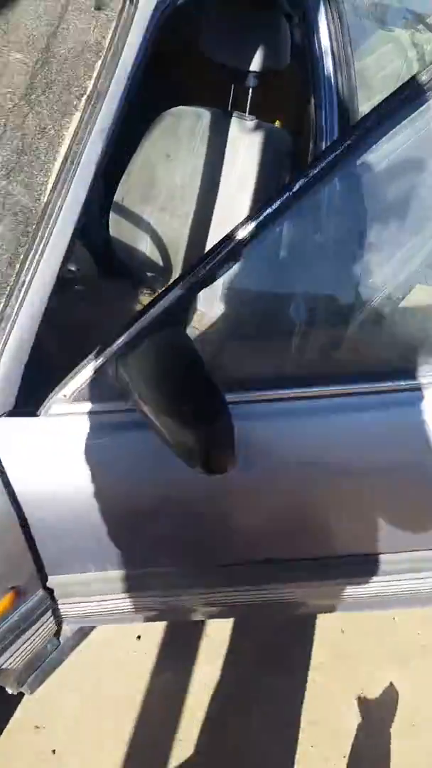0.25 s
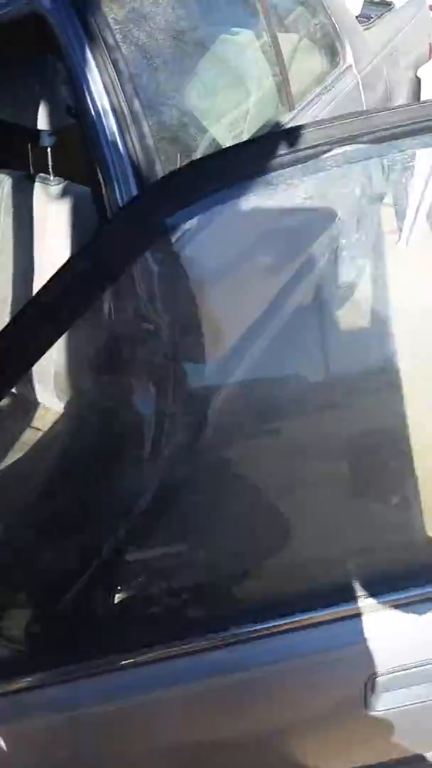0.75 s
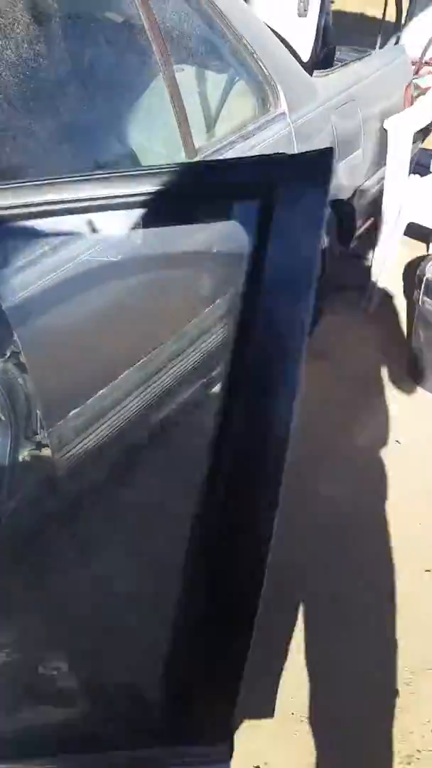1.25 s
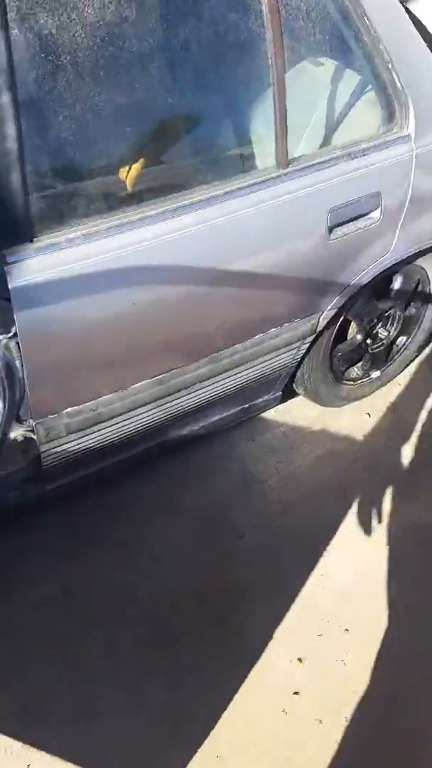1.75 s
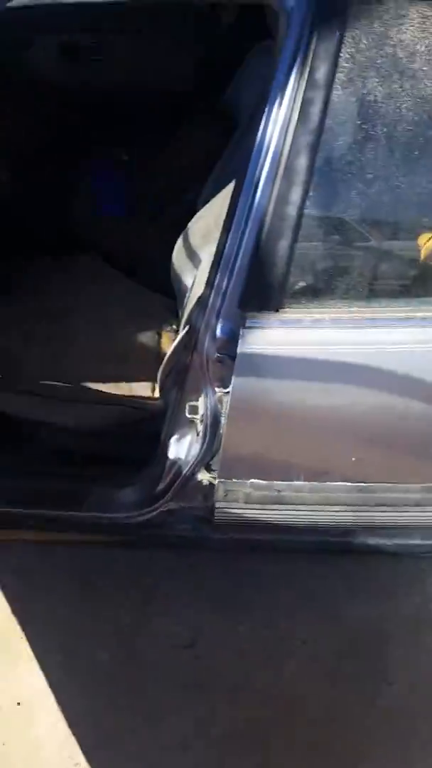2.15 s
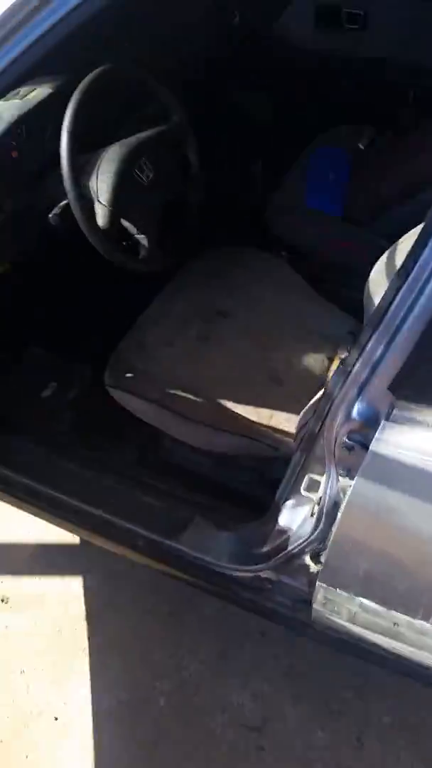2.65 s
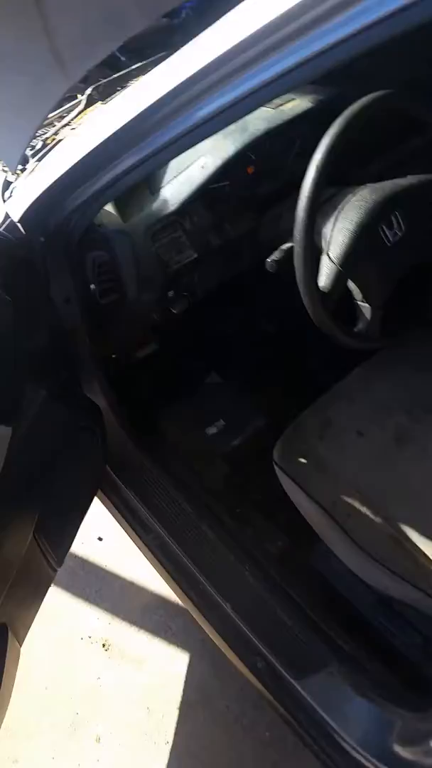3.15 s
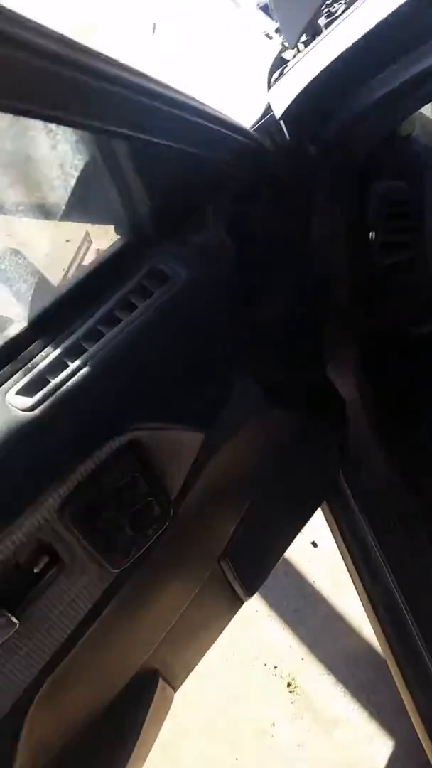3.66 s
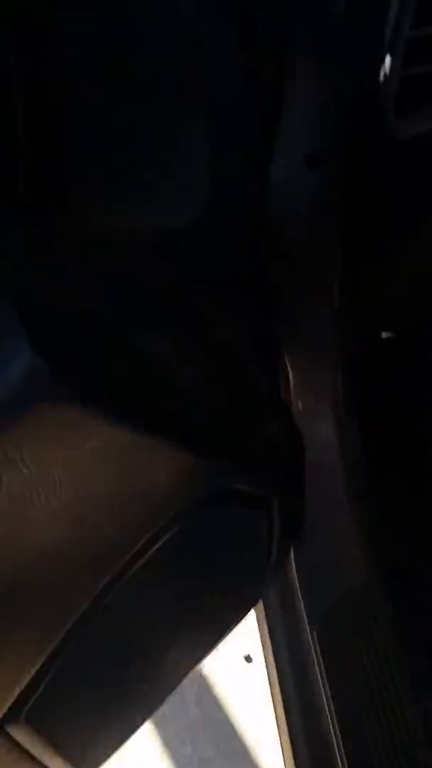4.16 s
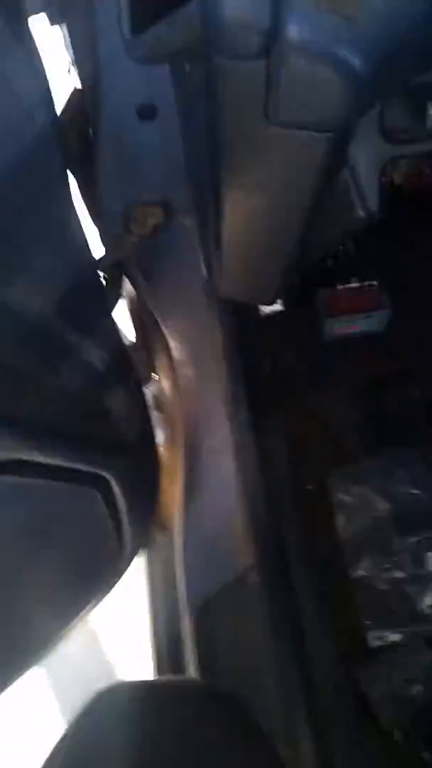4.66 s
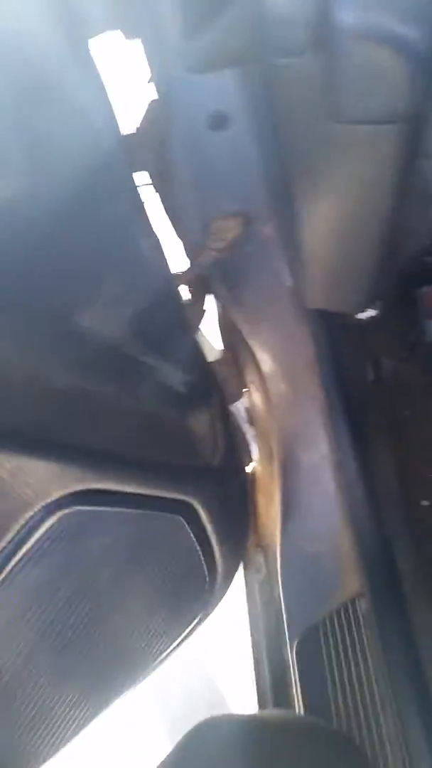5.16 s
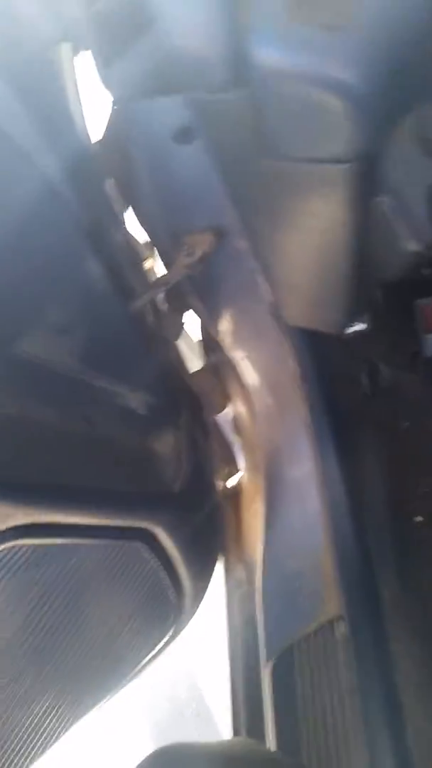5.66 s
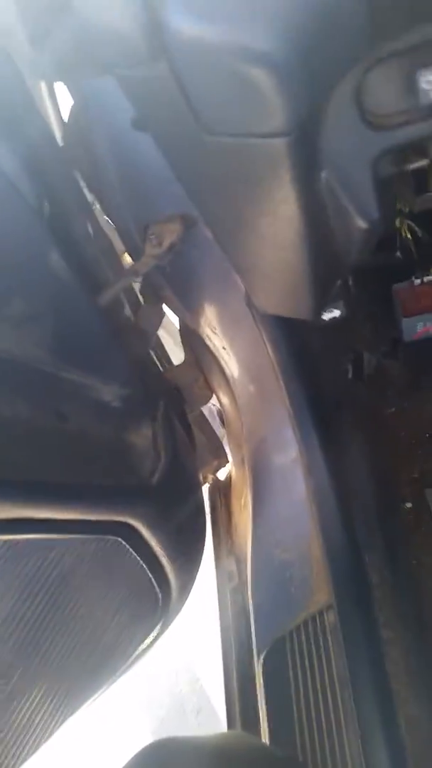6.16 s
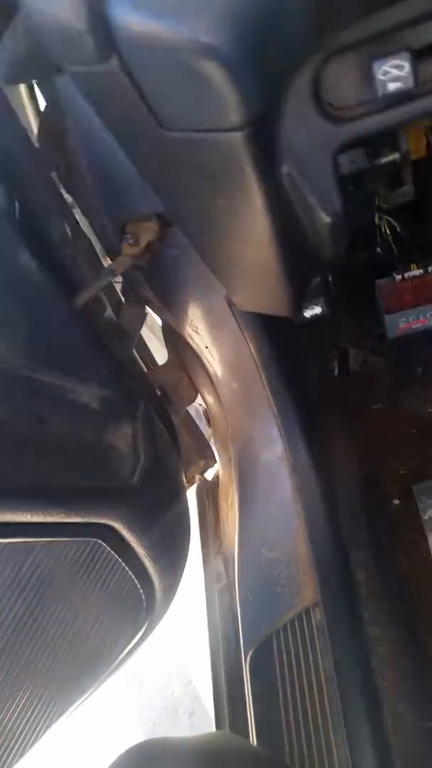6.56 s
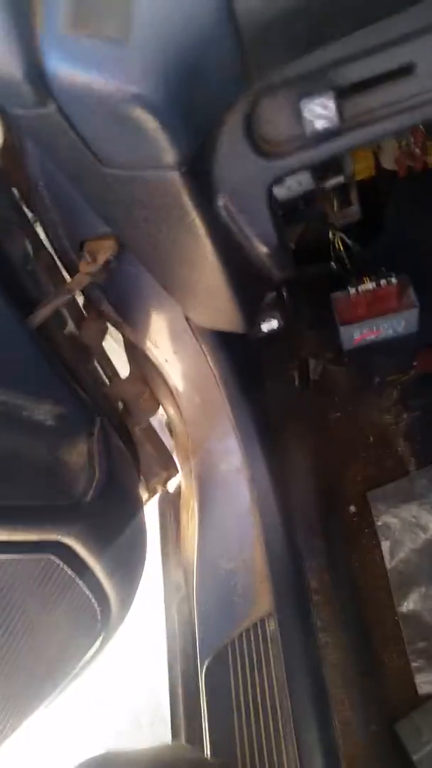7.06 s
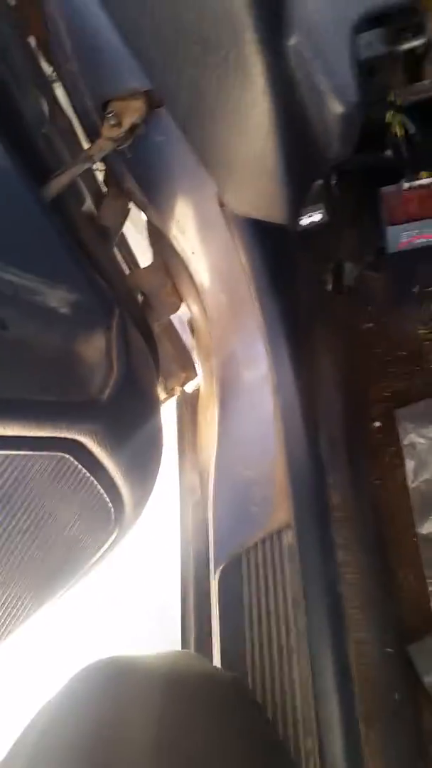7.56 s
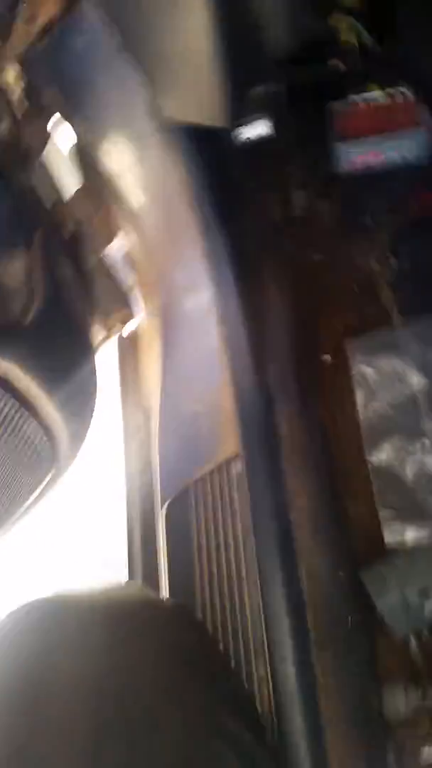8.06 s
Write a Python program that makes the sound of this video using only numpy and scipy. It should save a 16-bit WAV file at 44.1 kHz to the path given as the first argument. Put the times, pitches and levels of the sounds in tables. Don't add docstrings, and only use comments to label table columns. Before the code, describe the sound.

Close, moving phone pickup of a car idling lumpily: low exhaust throb, ringing body metal, airy hiss and quick valve ticks. It starts bright and full beside the engine, thins behind the door, then grows boomy inside the footwell. Near the end ignition stops; the beat breaks into slowing, irregular soft low notes and muffled rumbles, with a sharp plastic and metal click and short cloth rustles over the dying air.

```python
import sys
import numpy as np
from scipy import signal
from scipy.fft import rfft, irfft
from scipy.io import wavfile
from scipy.ndimage import uniform_filter1d

SR = 44100
rng = np.random.default_rng(int(sys.argv[2]) if len(sys.argv) > 2 else 0)


def magnitude_from_level(level_db):
    exponent = np.asarray(level_db, float) / 20
    return 10 ** exponent


def dump_mix(stems):
    frames = np.atleast_2d(stems).T
    limited = np.clip(frames, -1, 1)
    pcm = np.round(limited * 32767).astype(np.int16)
    wavfile.write(sys.argv[1], SR, pcm)


N = 366030
T = np.arange(N) / SR
CUT_S = 6.74
HEAVE_S = 0.053

# [time_s, engine_cycles_per_s]
IDLE = [(0.0, 11.263), (0.667, 10.754), (1.294, 11.33), (1.695, 11.221), (2.407, 10.574), (3.222, 10.975),
        (3.807, 10.962), (4.388, 10.651), (5.0, 10.844), (5.345, 10.985), (5.923, 10.545), (6.6, 10.95),
        (6.74, 10.465)]
# [time_s, stop]
WALK = [(0, 0), (.3, .5), (.6, 1), (.95, 1.32), (1.35, 2), (1.8, 2), (2.3, 3), (2.7, 3), (3.2, 4),
        (3.75, 4.5), (4.2, 5.5), (4.6, 5), (5.1, 5.5), (5.75, 5.5), (6.6, 5.5)]
# [time_s, level_db]
HEAVES = [(6.83, 3), (6.95, 5), (7.269, 3), (7.438, -2.5), (7.6, 3), (7.92, 8.5), (8.05, 6), (8.2, 0)]
STOP = np.interp(T, *np.transpose(WALK))


def evened(x):
    return x / np.sqrt(np.mean(x ** 2) + 1e-20)


def along(rows):
    s, *columns = np.transpose(rows)
    return [np.interp(T, s, column) for column in columns]


def at_stops(values):
    return np.interp(STOP, np.arange(len(values)), values)


def read(points, hz):
    f, value = np.transpose(points)
    return np.interp(np.log(hz + 1), np.log(f + 1), value)


def bump(s, half_s):
    return np.exp(-.5 * ((T - s) / half_s) ** 2)


def later(x, s):
    n, cycle = int(s * SR), int(SR / IDLE[0][1])
    return np.concatenate([x[cycle - n:cycle], x[:N - n]])


def band_filter(x, order, hz, kind):
    return signal.sosfiltfilt(signal.butter(order, hz, kind, fs=SR, output="sos"), x)


def ring(x, hz, width):
    r = np.exp(-np.pi * width / SR)
    angle = 2 * np.pi * hz / SR
    return signal.lfilter([(1 - r) * np.sin(angle)], [1, -2 * r * np.cos(angle), r * r], x)


def ports(pair, colour):
    # [pitch_hz, left_over_right_db]
    left_over_right = [(60, -11), (200, -5), (380, 1), (700, 4), (1290, 0.5), (2380, 3), (4400, 10),
                       (6000, -5), (8100, 35), (9500, 55), (11500, 13), (15000, 12)]
    # [pitch_hz, likeness]
    likeness = [(60, 1), (180, 0.26), (550, 0.12), (1650, 0.0085), (4970, -0.25), (15000, 0.0067)]
    hz = np.fft.rfftfreq(pair.shape[1], 1 / SR)
    a, b = rfft(pair)
    same = np.clip(read(likeness, hz), 0, 1)
    over = magnitude_from_level(read(left_over_right, hz))
    z = np.array([a * over, same * a + np.sqrt(1 - same ** 2) * b])
    z /= np.sqrt(1 + over ** 2 + 2 * same * over)
    out = irfft(z * magnitude_from_level(read(colour, hz)), pair.shape[1])
    return out / np.sqrt(np.mean(out.mean(0) ** 2))


def crank():
    drag_per_s, coast_s = 11.52, 2.924
    coast = (IDLE[-1][1] + drag_per_s) * np.exp(-(T - CUT_S) / coast_s) - drag_per_s
    rate = np.where(T < CUT_S, along(IDLE)[0], coast)
    return rate, np.cumsum(rate) / SR


def coasting(late_s=0):
    lost = 1 - np.exp(-np.maximum(T - CUT_S - late_s, 0) / 0.056)
    return lost, (T > CUT_S) * np.log2(IDLE[-1][1] / crank()[0])


def shake():
    shudder_db = [-40, -43, -50, -54, -46, -42, -26]
    shake_hz = 27.8
    low = ring(ring(rng.standard_normal(N), shake_hz, width=21), shake_hz, width=21)
    return evened(low) * magnitude_from_level(at_stops(shudder_db) - 3.4 * coasting()[1])


def rustle():
    # [pitch_hz, level_db_per_hz]
    cloth_colour = [(400, 4.5), (620, -4), (900, 4), (1300, 1.5), (2000, -11), (3200, -14), (5000, -36),
                    (6500, -56), (8800, -11), (10500, -24), (12500, -43)]
    # [time_s, level_db, half_length_s, fizz_db, body_db]
    rub_events = [(7.567, -48.5, .03, 9, -1), (7.61, -48, .015, -2, 5), (7.687, -45.5, 0.029, 3, 5),
                  (7.758, -50, 0.022, 10.5, -1), (7.832, -46, 0.026, 4.5, 2), (7.875, -55, .016, 12, -4),
                  (7.926, -49, 0.025, -2, 4.5), (8.036, -43, .035, -7, -13), (8.13, -50, .025, -17.5, -16),
                  (8.197, -50.5, 0.038, -17, -16)]
    clumps_db = 2.5 * evened(uniform_filter1d(rng.standard_normal(N), 500))
    rub = ports(rng.standard_normal((2, N)), cloth_colour) * magnitude_from_level(clumps_db)
    fizz = band_filter(rub, 4, 6000, "high")
    body = band_filter(rub, 4, 1200, "low")
    s, db, half, fizz_db, body_db = np.transpose(rub_events)
    swells = magnitude_from_level(db)[:, None] * np.array([bump(*b) for b in zip(s, half)])
    sound = swells.sum(0) * rub
    sound += (magnitude_from_level(fizz_db) - 1) @ swells * fizz
    return sound + (magnitude_from_level(body_db) - 1) @ swells * body


def clicks():
    # [time_s, peak_db, rise_s, fade_60db_s, brightness_db_per_octave]
    creak_events = [(3.298, -33, .002, .035, -14), (4.4405, -23.5, .003, .038, -4.5)]
    # [time_s, peak_db, rise_s, fade_60db_s, brightness_db_per_octave]
    latch_events = [(7.4672, -33, 0.001, 0.055, 1), (7.4737, -15, 0.0028, 0.057, 1),
                    (7.481, -24, 0.0023, 0.045, -3), (7.491, -34.5, .0004, 0.11, -2.5),
                    (7.677, -40, 0.0035, 0.082, -21), (7.965, -40, 0.0079, .1, -14),
                    (7.993, -48, 0.00049, 0.031, 0)]
    # [pitch_hz, level_db_per_hz]
    trim_colour = [(500, -25), (1100, -2), (2000, 0), (3200, -5), (4400, -1), (6000, -22), (9000, -10),
                   (15000, -22)]
    # [pitch_hz, level_db_per_hz]
    latch_colour = [(240, -41), (400, -14), (560, -4), (680, -14), (790, -5), (1030, -21), (1400, -5),
                    (1830, -3), (2200, -14), (2800, -10), (4510, -8), (6740, -27), (8630, -2), (14800, -18),
                    (16000, -25)]
    # [pitch_hz, level_db, fade_60db_s]
    spring_modes = [(4600, -52, .16), (2510, -55, .15), (810, -42, .15), (577, -31, 0.11), (487, -49, .12)]
    out, t = np.zeros((2, N)), np.arange(4096) / SR
    for s, db, rise, t60, tilt_db in creak_events + latch_events:
        points = latch_colour if s > CUT_S else trim_colour
        colour = [(hz, v + tilt_db * np.log2(hz / 4000)) for hz, v in points]
        shape = np.clip(t / rise, 0, 1) ** 2 * magnitude_from_level(db - 60 * t / t60)
        at = round(s * SR)
        out[:, at:at + len(t)] += ports(rng.standard_normal((2, len(t))), colour) * shape
    at, t = round(latch_events[1][0] * SR), np.arange(8192) / SR
    spring = sum(magnitude_from_level(db - 60 * t / t60) * np.sin(2 * np.pi * hz * t) for hz, db, t60 in spring_modes)
    out[:, at:at + len(t)] += spring * np.clip(t / 0.0038, 0, 1)
    return out


def thuds():
    thud_hz = 209
    lost, halvings = coasting()
    lumps_db = 2.4 * evened(uniform_filter1d(rng.standard_normal(N), 900))
    lumps_db += 0.7 * sum(db * bump(s, HEAVE_S) for s, db in HEAVES)
    gas = ring(ring(rng.standard_normal(N), thud_hz, width=240), thud_hz, width=240)
    level_db = -30.5 - 6.5 * halvings + lumps_db
    return evened(gas) * lost * magnitude_from_level(level_db) * magnitude_from_level([[-1.2], [1.2]])


def gulps():
    # [time_s, peak_db, pitch_hz, half_length_s]
    gulp_events = [(6.799, -11.5, 87, 0.03), (6.843, -15, 91, 0.011), (6.888, -12.5, 84, 0.015),
                   (6.949, -15, 90, 0.019), (7.04, -23, 80, 0.022), (7.126, -20, 101, 0.028),
                   (7.21, -17.5, 86, .022), (7.28, -14.5, 77.4, 0.032), (7.36, -24, 84, 0.03),
                   (7.43, -20, 93, 0.023), (7.529, -29, 80, .03), (7.605, -18, 100, 0.023),
                   (7.671, -25, 62, 0.024), (7.801, -23, 80, 0.018), (7.922, -21.5, 56.6, 0.028),
                   (7.991, -25, 95, 0.023), (8.061, -22, 74, 0.031), (8.198, -27, 60, 0.028)]
    out = np.zeros(N)
    for s, db, hz, half in gulp_events:
        at = round((s - 3 * half) * SR)
        t = np.arange(-3 * half, 3 * half, 1 / SR)[:N - at]
        out[at:at + len(t)] += magnitude_from_level(db) * np.exp(-.5 * (t / half) ** 2) * np.cos(2 * np.pi * hz * t)
    return out * magnitude_from_level([[-1.1], [1.1]])


def belt_squeal():
    # [start_s, hold_s, level_db]
    squeal_events = [(.28, .36, -48.5), (6.935, .03, -59), (7.06, .04, -60), (7.2, .045, -60),
                     (7.365, .04, -61)]
    whistle = evened(ring(rng.standard_normal(N), hz=12480, width=260))
    edge_s = .025
    swell = sum(magnitude_from_level(db) * np.clip(np.minimum(T - s, s + hold - T) / edge_s + 1, 0, 1)
                for s, hold, db in squeal_events)
    return whistle * swell * magnitude_from_level([[5.5], [-8]])


def ticks():
    # [time_s, peak_db]
    tick_events = [(2.135, -28), (2.2296, -37), (2.323, -32), (2.4175, -21), (2.5098, -24), (2.605, -29),
                   (2.6973, -21), (2.791, -28), (2.8834, -25), (2.975, -32), (3.022, -43), (3.11, -26),
                   (3.1567, -28), (3.2502, -20.5), (3.5232, -33), (3.6124, -30), (3.703, -20.5),
                   (3.795, -27), (3.886, -24), (3.9748, -24), (4.07, -27), (4.1594, -31), (4.2533, -23),
                   (4.348, -20.5), (4.441, -20.5), (4.5346, -26), (4.6275, -35), (4.6733, -26),
                   (4.7226, -27), (4.8128, -31), (4.8596, -24), (4.908, -28), (4.998, -24), (5.0893, -25),
                   (5.1816, -35), (5.23, -23), (5.272, -20), (5.3628, -36), (5.4116, -27), (5.5466, -30),
                   (5.643, -21), (5.686, -24), (5.7323, -26), (5.8298, -39), (5.8755, -40), (5.9245, -26),
                   (6.0184, -24), (6.0646, -23), (6.113, -18.5), (6.16, -22), (6.2072, -25), (6.2507, -22),
                   (6.2968, -18.5), (6.343, -23), (6.3906, -20), (6.4853, -20), (6.5293, -24),
                   (6.5719, -22), (6.6195, -25), (6.6644, -21),
                   (0.0448, -24), (0.1351, -25), (0.4075, -24), (0.7845, -33), (0.8754, -24), (0.9845, -28),
                   (1.8627, -23), (1.9535, -30), (2.0892, -36), (6.757, -38), (6.7956, -33), (6.8709, -34),
                   (6.8978, -29), (7.0141, -29), (7.136, -29), (7.2745, -32), (7.4331, -42)]
    rise_s, t60_s, under_db = .002, .046, -9.5
    out, t = np.zeros(N), np.arange(2048) / SR
    for s, db in tick_events:
        at = round(s * SR)
        u = t / (2.2 if s > CUT_S else 1)
        out[at:at + len(t)] += np.clip(u / rise_s, 0, 1) * magnitude_from_level(db + under_db - 60 * u / t60_s)
    return out


def leak_puffs(puff_db):
    puff_place = [0.43, 0.6636, 0.651, 0.61, 0.566, 0.527, 0.53]
    lost = coasting()[0]
    place = at_stops(puff_place) * (1 - lost) - .12 * lost
    puff_db = puff_db - 31 * (T > 6.7)
    half = 2 * (crank()[1] - place) + 4
    count, phase = half.astype(int), half % 1
    size_db = np.where(count % 2, -4.5, 0) + 1.4 * rng.standard_normal(400)[count]
    gate = np.clip(phase / 0.12, 0, 1) * np.clip((1 - phase) / 0.16, 0, 1)
    return magnitude_from_level(puff_db + size_db - 10.4 * phase) * gate


def air():
    # [pitch_hz, level_db_per_hz]
    whirr_colour = [(380, -3), (640, -3.5), (726, -4), (864, -5), (1130, -8), (2190, -12), (2990, -19),
                    (4280, -19), (4720, -22.5), (5460, -42), (6500, -61), (8450, -53), (14300, -120)]
    # [pitch_hz, level_db_per_hz]
    leak_colour = [(1760, -45), (3000, -11), (3750, -9.5), (4320, -2.5), (4630, -7), (5400, -15),
                   (6090, -17), (7100, -12.5), (8400, 0), (9070, 3.5), (10800, -5), (14800, -4),
                   (15400, -6.5), (16000, -22)]
    air_db = [
        (-38, -41, -46, -46, -44, -46, -43.5),
        (-33, -39.5, -44, -45, -43, -47.5, -47.5),
        (3.5, 6.5, 5.5, 10.5, 8, 10.5, 14),
    ]
    # [drop_db, fade_db_per_halving_of_speed]
    air_end = [
        (-1, -6.5),
        (1.5, -12.5),
        (-6, 11),
    ]
    lost, halvings = coasting()
    whirr_db, leak_db, puff_db = (at_stops(db) + drop * lost + fade * halvings
                                  for db, (drop, fade) in zip(air_db, air_end))
    puffs = leak_puffs(puff_db)
    flutter_db = 0.74 * evened(uniform_filter1d(rng.standard_normal(N), 130))
    bright = [(hz, db + 2.2 * np.log2(hz / 9000)) for hz, db in leak_colour]
    steady, jets = (ports(rng.standard_normal((2, N)), colour) for colour in (leak_colour, bright))
    treble = band_filter(steady, 2, 11000, "high")
    dull_db = -8 * np.clip((T - 7.56) / .08, 0, 1)
    steady += (magnitude_from_level(dull_db) - 1) * treble
    jet_strength = np.hypot(0.79 * puffs * magnitude_from_level(leak_db), ticks())
    leak = (steady * magnitude_from_level(leak_db) + jet_strength * jets) * magnitude_from_level(flutter_db)
    whirr = ports(rng.standard_normal((2, N)), whirr_colour) * magnitude_from_level(whirr_db + 4.0 + 0.96 * flutter_db)
    return leak + whirr * (1 + 0.12 * puffs) + belt_squeal()


def strokes(spread_db, slip_s):
    first, apart = .585, .245
    rate, cycles = crank()
    pushes = np.zeros((4, N))
    chance = rng.standard_normal((100, 4, 2))
    for k in range(4):
        s = np.interp(np.arange(-1, 99) + first + k * apart, cycles, T, left=0, right=0)
        loose = np.where(s > CUT_S, 3, 1)
        at = np.clip((s + slip_s * loose * chance[:, k, 0]) * SR, 0, N - 1).astype(int)
        size = magnitude_from_level(spread_db * loose * chance[:, k, 1]) / np.sqrt(rate[at])
        np.add.at(pushes[k], at, (s > 0) * size)
    return pushes


def part_pushes(gas):
    cylinders_db = [-1.2, -.6, 0, -8.5]
    lope_share = [
        (2.4, 2.2, 2.2, 2.2, 2.2, 1.6, 0.89),
        (1.1, 1.2, 1.6, 1.83, 2.4, 2.3, 3.8),
        (0.34, 0.39, 0.85, 0.27, 0.44, 1.4, 0.53),
        (2.1, 0.44, 1.1, 0.83, 1.05, 0.43, 0.35),
        (1.1, 0.96, 1.7, 2.2, 1.1, 1.1, 2.1),
    ]
    gap_shift = [
        (0.1, .05, .05, .05, .05, -.2, -1.3),
        (-0.4, -0.3, .4, .6, 0.28, 0.031, -0.021),
        (0.7, 0.41, .05, .2, .05, -0.29, -0.21),
        (-0.16, -0.05, .05, .05, 0.045, -0.045, 0.18),
        (-0.1, 0.17, 0.062, .05, 0.054, .05, 0.42),
    ]
    rows = strokes(spread_db=.8, slip_s=.0002)
    at = np.flatnonzero(rows.any(0))
    direct = np.tile(gas, (5, 1))
    for part, lope, shift in zip(direct, lope_share, gap_shift):
        order = np.arange(4)[:, None] - np.interp(STOP[at], range(7), shift)
        pattern_db = np.interp(order, range(4), cylinders_db, period=4)
        pattern_db = pattern_db * np.interp(STOP[at], range(7), lope)
        part[at] += (rows[:, at] * magnitude_from_level(pattern_db)).sum(0)
    return direct


def with_echoes(direct, place):
    # [late_s, share]
    echo_paths = [(0.0101, -0.7), (0.016, 0.45), (.027, 0.64), (.039, -0.69)]
    echo_db = [
        0,
        -8,
        -8.5,
    ]
    echo = magnitude_from_level(np.interp(place, [0, 1, 2], echo_db))
    return [d + echo * sum(share * later(d, s) for s, share in echo_paths) for d in direct]


def body_levels():
    part_db = [
        (-23, -25, -38, -33, -35, -25.5, -20),
        (-26, -18.5, -18.5, -19.5, -21.5, -18.5, -13),
        (-14.5, -17, -17.5, -16.5, -14, -24, -25.5),
        (-14.5, -14.5, -16, -24.5, -20, -20, -17.5),
        (-20.5, -26.5, -25, -28.5, -26.5, -30.5, -27),
    ]
    # [drop_db, fade_db_per_halving_of_speed, share_of_each_heave, late_s]
    part_end = [
        (-1.5, -4.5, 0.55, -.01),
        (-10.5, -7, 0.5, -.045),
        (-8, -5, 0.56, -.04),
        (-20, -5, 0.47, .015),
        (-27, -0.5, 0.68, .015),
    ]
    # [time_s, panels_db, panels_tilt_db_per_octave, block_db]
    lean_moves = [(0, 1.3, -7, -2), (.3, 0.7, -6, 0.5), (.7, -0.5, -2.5, -2.9), (1.1, 0.7, -1, 1.3),
                  (1.45, -1.5, -5, -2), (1.8, -2.5, -6, -3.5), (2.2, 0.3, -2, -2), (2.7, -0.2, 6, 2),
                  (3.3, 0.3, .1, -0.3), (3.8, 2.3, -2.5, 1.2), (4.2, -0.7, -10, 0.5), (4.7, -0.5, 9, 1.5),
                  (5.25, 1.5, 1, -0.8), (5.55, .1, 3, 0), (5.85, -3.5, -2, -1.7), (6.2, -0.2, -3.5, -0.6),
                  (6.6, 1.5, -6, 0)]
    halvings = coasting()[1]
    heave_db = sum(db * bump(s, HEAVE_S) for s, db in HEAVES)
    levels_db = [at_stops(db) + drop * coasting(late)[0] + fade * halvings + share * heave_db
                 for db, (drop, fade, share, late) in zip(part_db, part_end)]
    lean_db, tilt_db, turn_db = along(lean_moves)
    levels_db[3] = levels_db[3] + lean_db
    levels_db[4] = levels_db[4] + turn_db
    return levels_db, tilt_db


def rung(pushes, modes, standing, place, level_db, path_s, tilt_db=0):
    group = np.zeros(N)
    for (hz, width, *db), stand_db in zip(modes, standing):
        late_s = .0032 * np.log2(hz / 30) + path_s * rng.random()
        once = ring(pushes, hz, width)
        steep = ring(once, hz, 3 * width) if hz > 200 else once
        mode_db = np.interp(place, [0, 1, 2], db) + np.interp(STOP, range(7), stand_db)
        mode_db = mode_db + tilt_db * np.log2(hz / 280)
        group += magnitude_from_level(mode_db) * later(evened(steep), late_s)
    limits_hz = .84 * min(modes)[0], 1.2 * max(modes)[0]
    group = evened(band_filter(group, 1, limits_hz, "band"))
    slow_power = uniform_filter1d(group ** 2, 16000, mode="mirror")
    return magnitude_from_level(level_db) * group / np.sqrt(slow_power + 1e-3)


def blow_down(pushes):
    snap_db = [-37, -22.5, -23.5, -24.5, -22.5, -31, -24.5]
    snap = evened(band_filter(later(pushes, 0.01248), 1, (80, 330), "band"))
    return snap * magnitude_from_level(at_stops(snap_db) - 25.6 * coasting(-0.049)[0])


def exhaust():
    # [pitch_hz, width_hz, wing_db, door_db, footwell_db]
    boom_modes = [(37.7, 14, 9, -5, -8), (64, 14, -4, 3, -20)]
    pipe_modes = [(90, 37, 0, 4, -26), (74, 6, -5, -9, 3.5), (99, 10, 8, 15, 14)]
    box_modes = [(131.8, 13.8, -4.5, 5, -19), (118, 20, -22, -34, 3.5), (184.8, 33.4, 0.5, 3.5, 9.5)]
    panel_modes = [(230, 59, 3, 7, -0.95), (244.9, 14.8, -2, -3, 0.7), (278.6, 17.5, -9, -4.5, -0.64),
                   (306.2, 28.6, 0.5, -8.5, 0.052), (335.3, 21.6, 3.5, -1.5, -1.73)]
    block_modes = [(396.5, 32.4, -3.5, 1, 1), (441, 23.5, -0.5, -3, 3.5), (475.3, 16, 0, -0.5, 4),
                   (539.4, 23.5, -2, -2, -1.5), (614, 46, -10, -6.5, -15), (678, 60, -10.5, -5, -19.5),
                   (756, 61, -9.5, -14.5, -4)]
    box_standing = [(2.5, 0.1, 0.1, 3.5, 0.1, 13, -1), (-2, 0.1, 0.1, -8, 0.1, -11, -1),
                    (-3.5, 1.5, 0.1, -7.5, 0.1, 9, 1.5)]
    panel_standing = [(-9, -1, -1.5, -5.5, -0.7, -1.5, -7), (-3.5, -2, -5, 10.5, 1.5, 4.5, 7),
                      (-10, -6, -15, 8, -10, -2.5, -0.5), (5.5, 0.5, 5.5, 10, 0, 1.6, 6),
                      (-8, 2.5, -5.5, -0.5, 4.5, -6, 5.5)]
    block_standing = [(2, 2, 3, 0.1, 4, -7.5, 5.5), (5.5, 3.5, -4.5, 2.5, 0, 7.5, -1.3),
                      (3, 4.5, 0.5, 3, 1, 0, -2.5), (-3, -7, -6.5, -2, -2, -6, 3),
                      (5, -1, -1, -0.5, 1.5, -3, -4), (0, -0.5, 0, -2, 0, 5, -7), (-5, 3, -1, 4, 2, 2.5, 3)]
    facing_place = [0.51, 0.18, 1.24, 0.98, 0.73, 1.63, 2.4]
    still = np.zeros((3, 7))
    place = at_stops(facing_place)
    lost, halvings = coasting()
    levels_db, tilt_db = body_levels()

    swirl = rng.standard_normal((2, N)) * np.sqrt(3 / SR)
    swirl_db = -22 + 22 * lost + 3.3 * halvings
    direct = part_pushes(swirl[0] * magnitude_from_level(swirl_db))
    pushes = with_echoes(direct[:4], place)

    modes = boom_modes, pipe_modes, box_modes, panel_modes
    standing = still, still, box_standing, panel_standing
    parts = zip(pushes, modes, standing, levels_db, (0, 0, 0, tilt_db))
    body = sum(rung(p, m, w, place, db, path_s=.0015, tilt_db=tilt) for p, m, w, db, tilt in parts)
    body -= blow_down(direct[2])
    body = band_filter(body, 3, 500, "low")
    block = [rung(direct[4] + .6 * s, block_modes, block_standing, place, levels_db[4], path_s=.016)
             for s in swirl]
    aside = rung(pushes[3], panel_modes, panel_standing, place, levels_db[3] - 13, path_s=.01,
                 tilt_db=tilt_db)
    left = magnitude_from_level(-2.0) * (body + aside + block[0])
    right = magnitude_from_level(1.6) * later(body + .6 * block[0] + .5 * block[1], .00028)
    return np.array([left, right])


def scene():
    return exhaust() + air() + clicks() + rustle() + shake() + thuds() + gulps()


def band_limit(x):
    return signal.sosfilt(signal.butter(12, 16430, fs=SR, output="sos"), x)


def record(dry):
    cut = signal.sosfilt(signal.butter(2, 24, "high", fs=SR, output="sos"), dry)
    held = np.tanh(cut / 1.15) * 1.15
    held = signal.oaconvolve(held, signal.firwin(401, 15980, fs=SR)[None], "same")
    return band_limit(held)


dry = scene()
out = record(dry)
dump_mix(out)
```